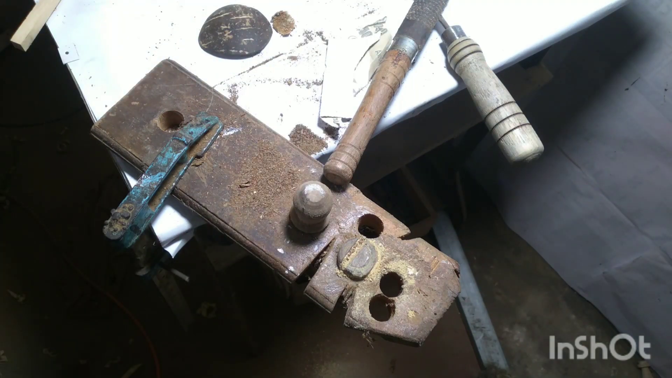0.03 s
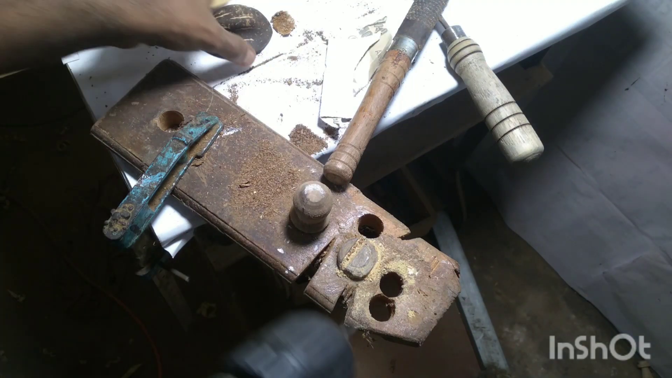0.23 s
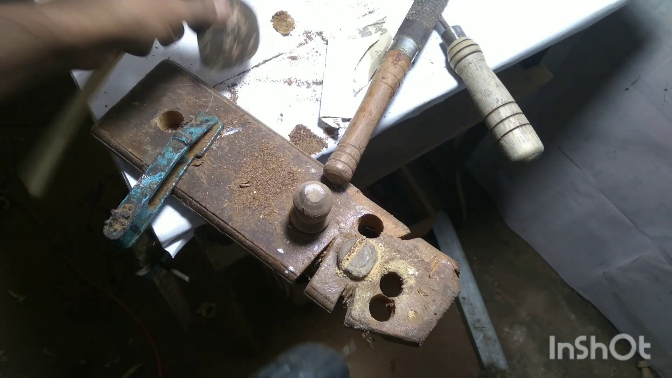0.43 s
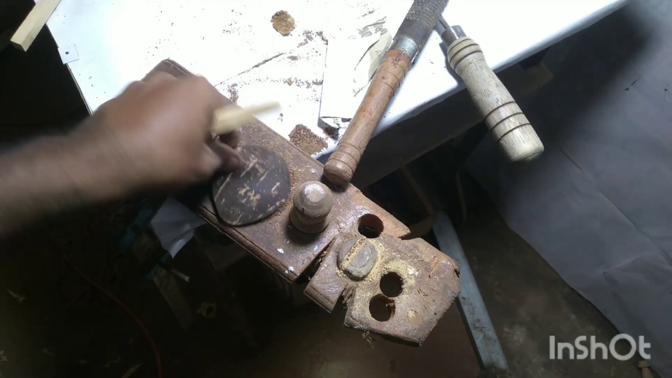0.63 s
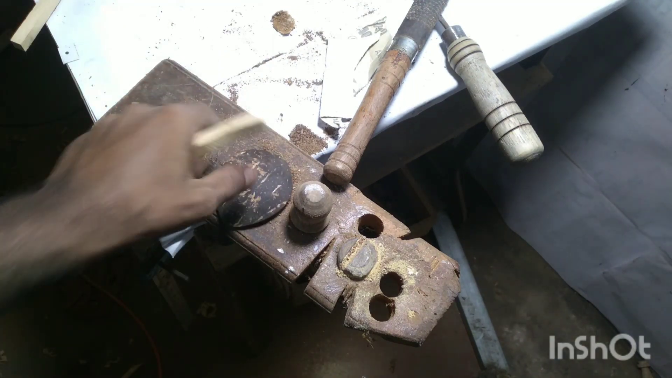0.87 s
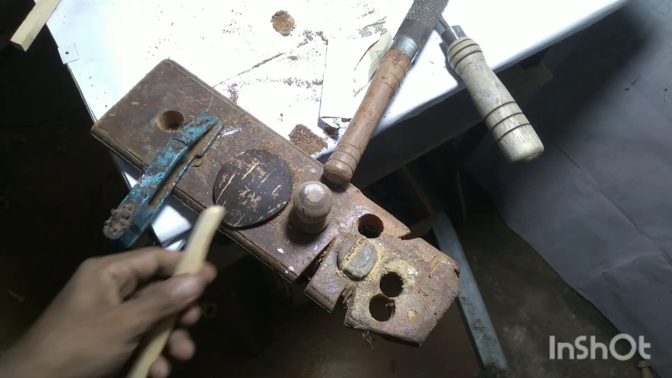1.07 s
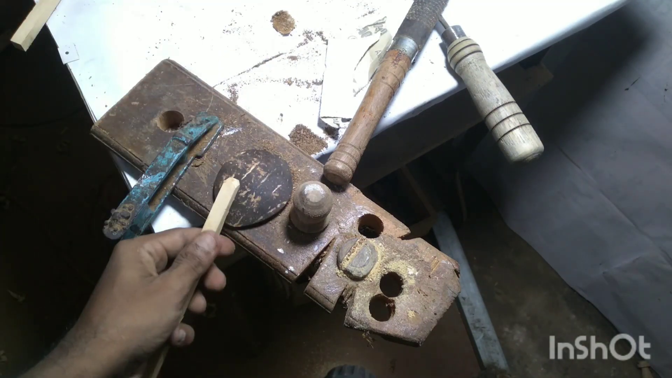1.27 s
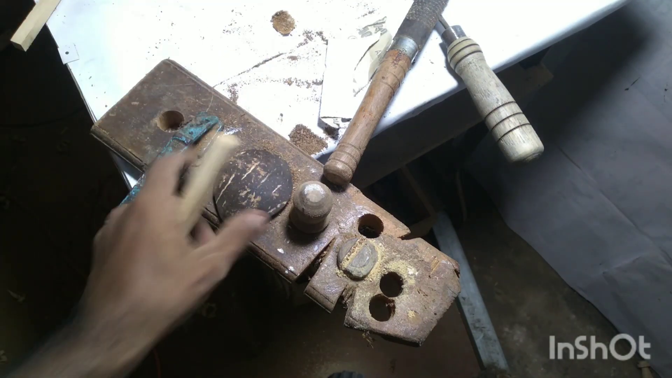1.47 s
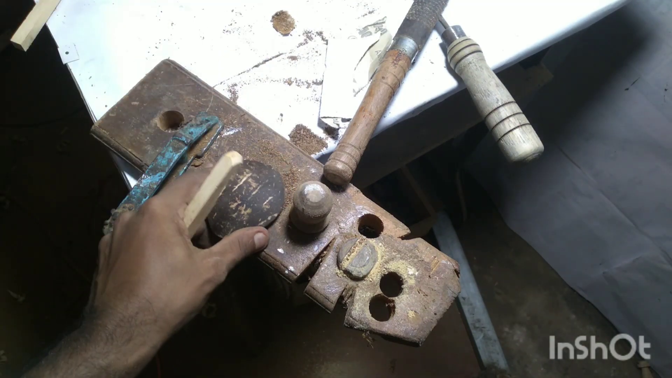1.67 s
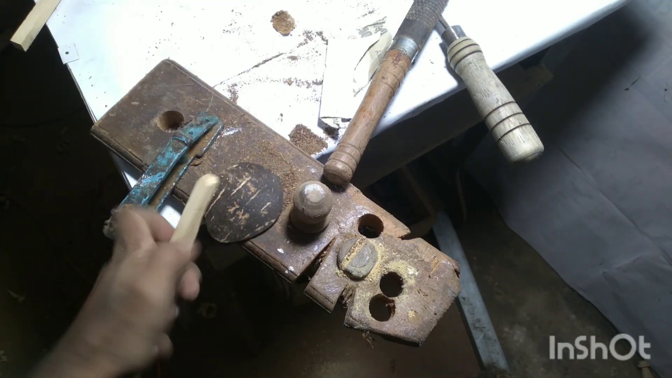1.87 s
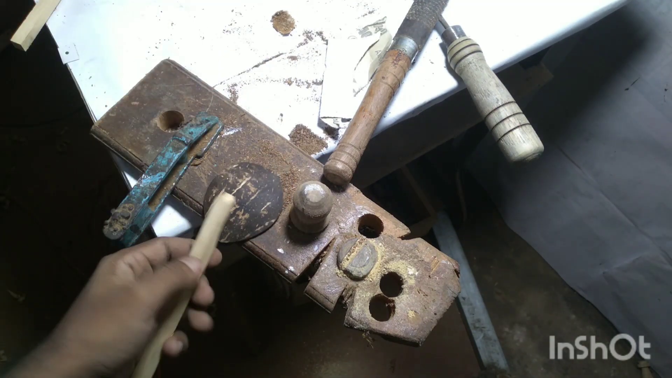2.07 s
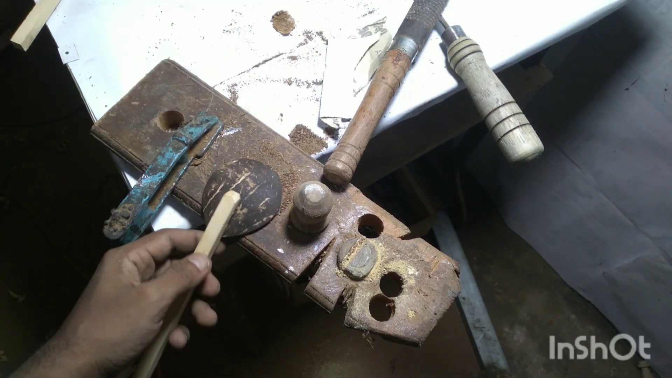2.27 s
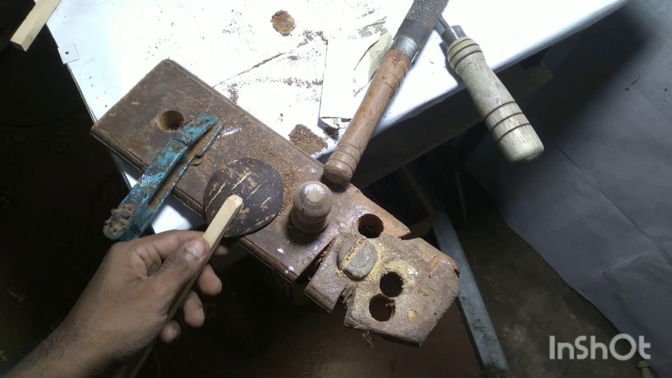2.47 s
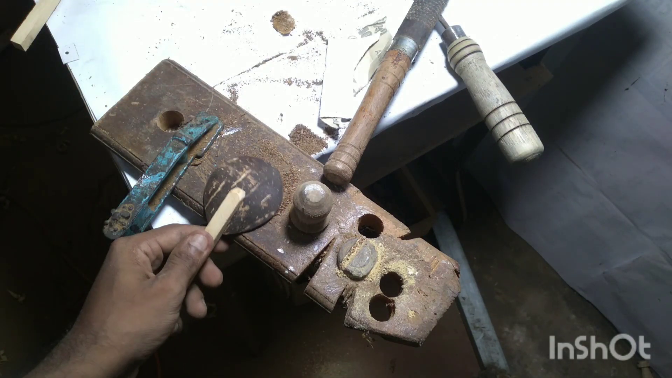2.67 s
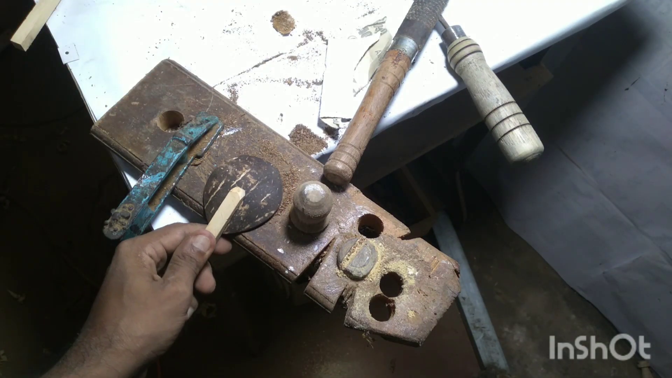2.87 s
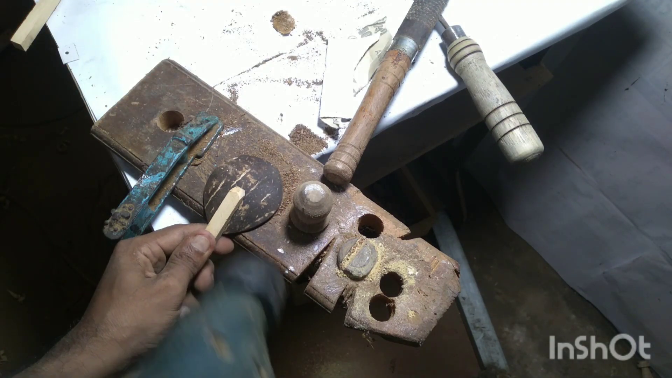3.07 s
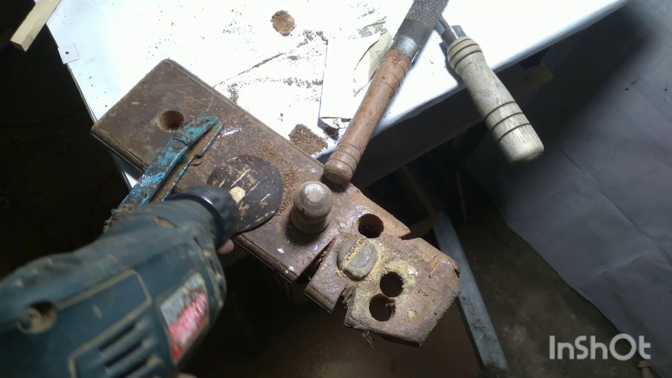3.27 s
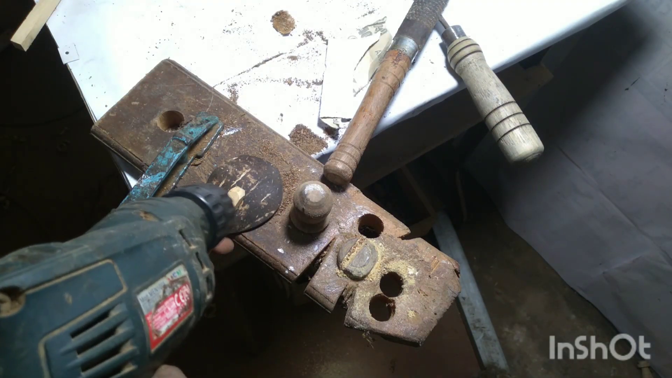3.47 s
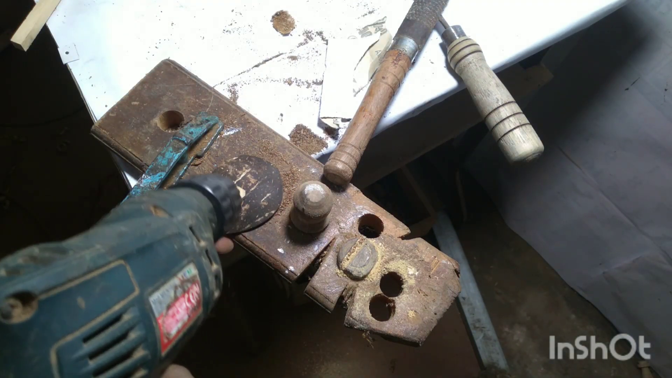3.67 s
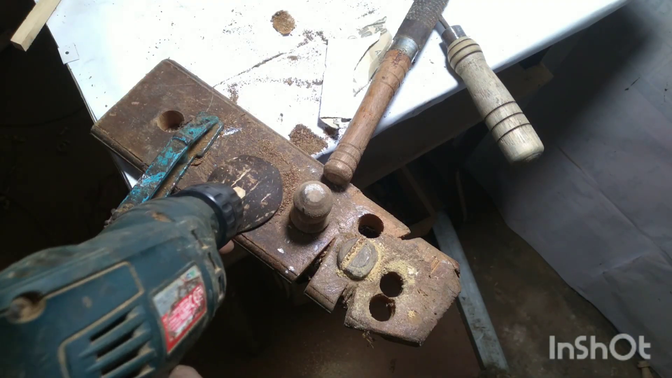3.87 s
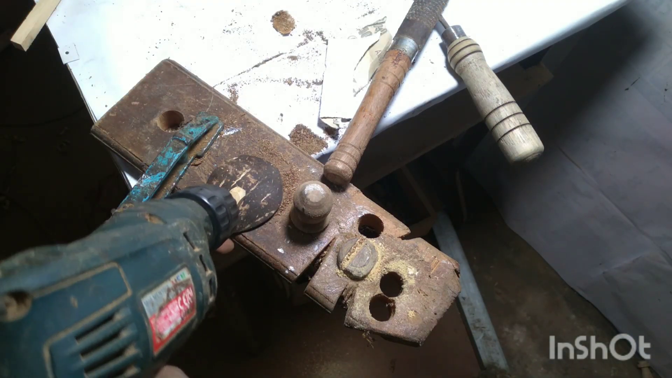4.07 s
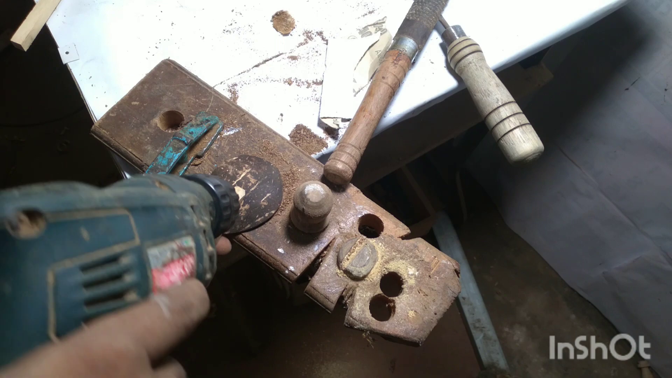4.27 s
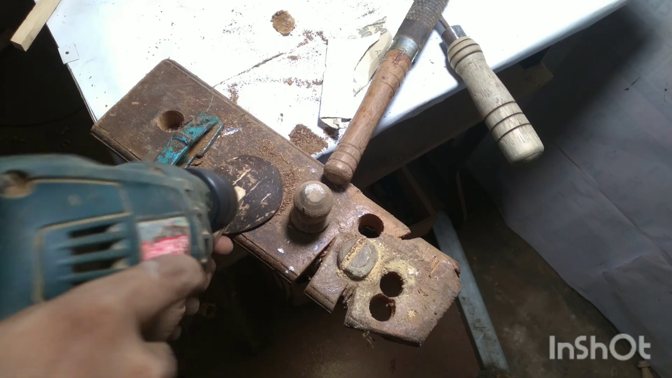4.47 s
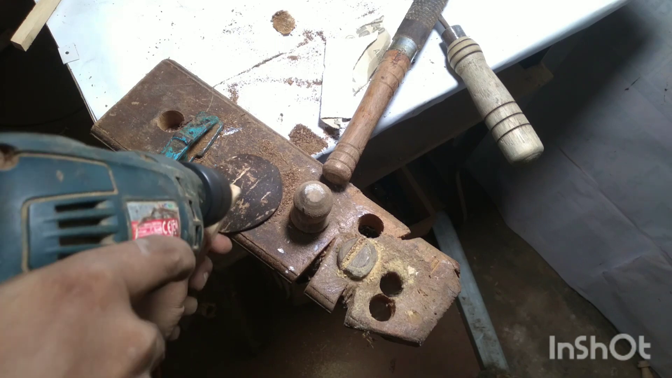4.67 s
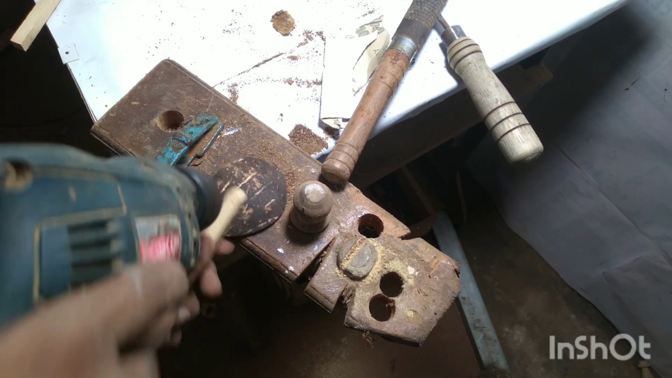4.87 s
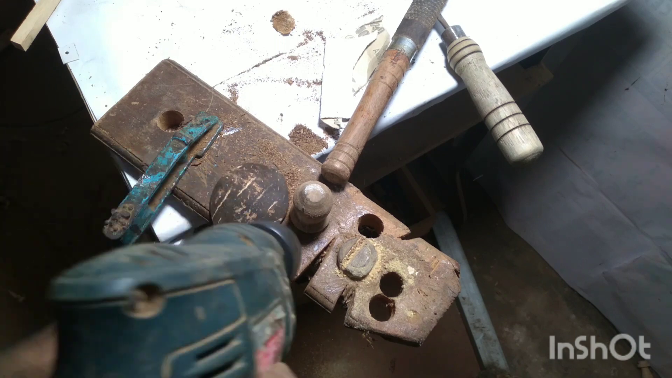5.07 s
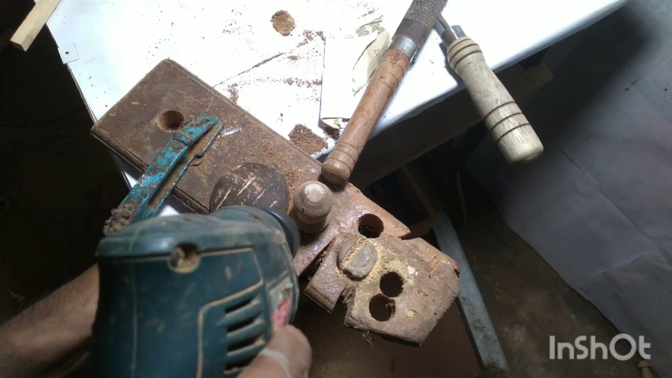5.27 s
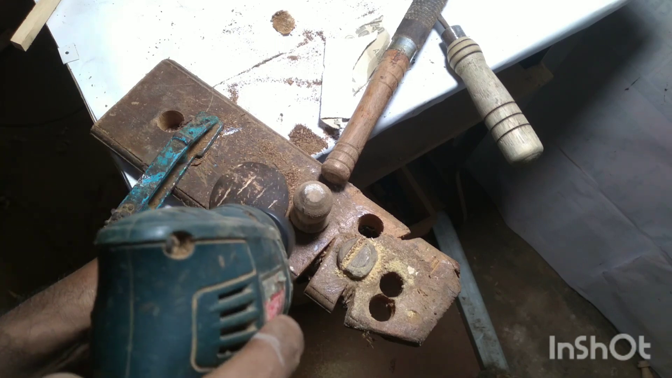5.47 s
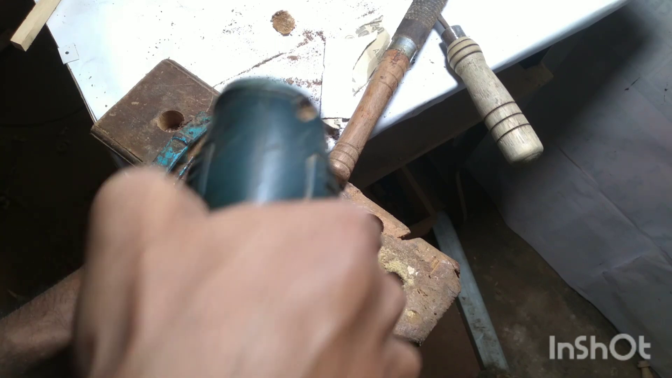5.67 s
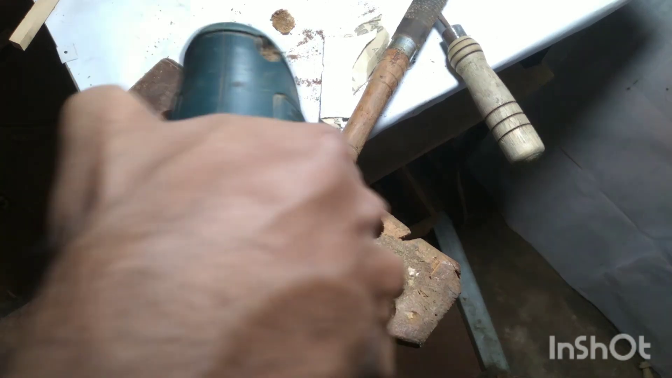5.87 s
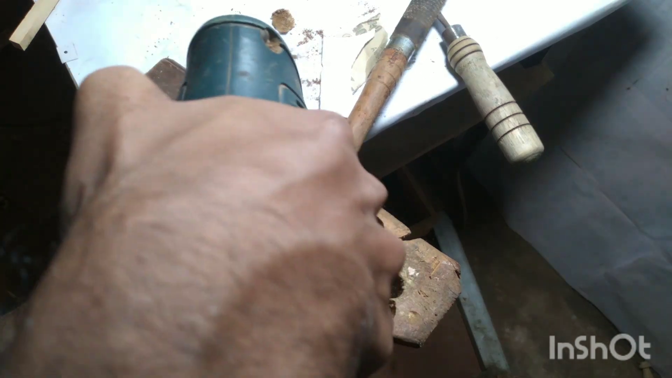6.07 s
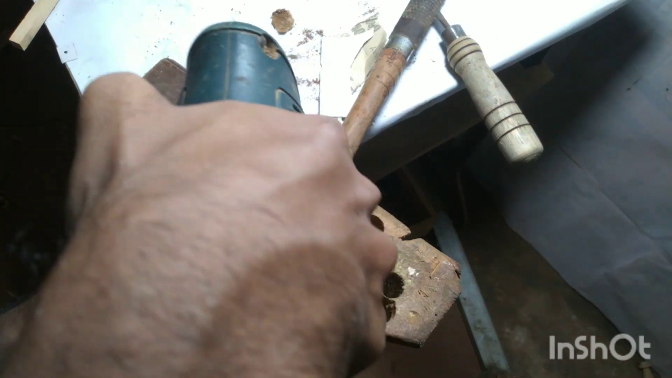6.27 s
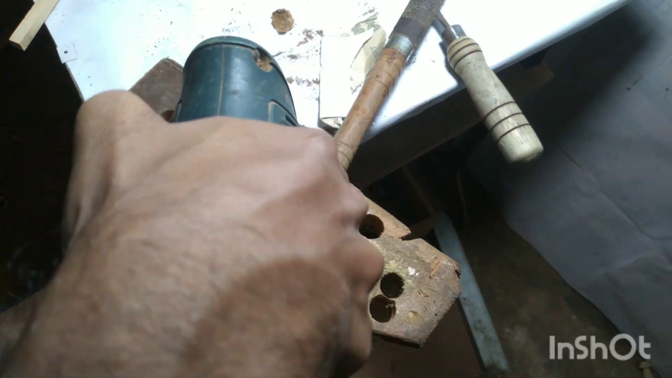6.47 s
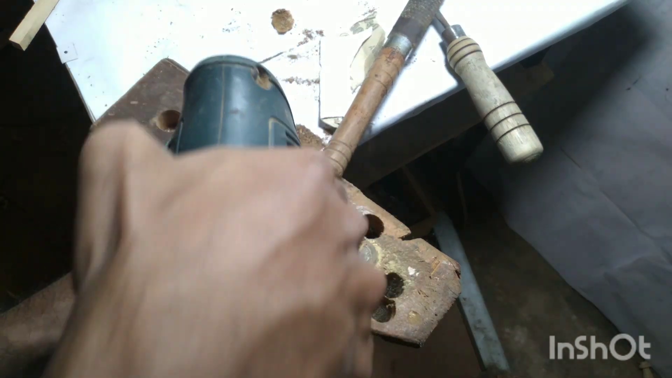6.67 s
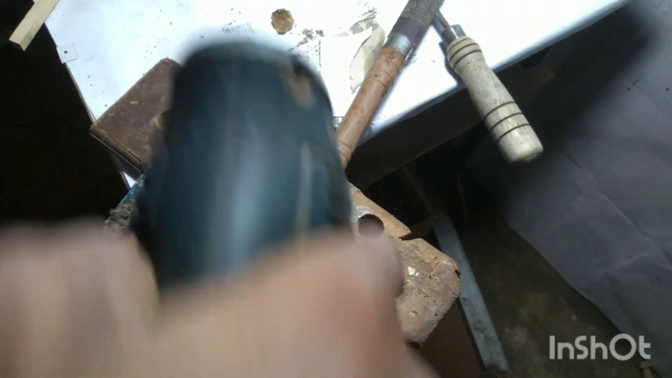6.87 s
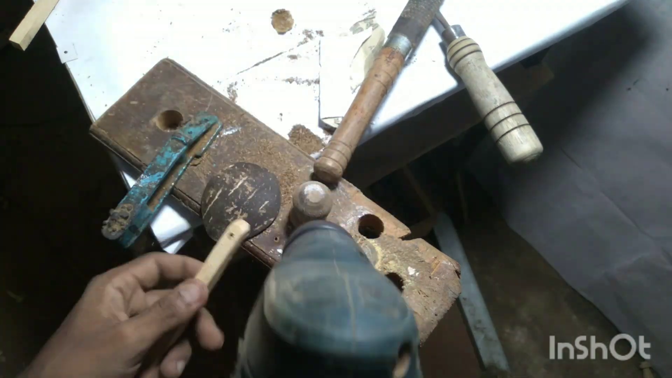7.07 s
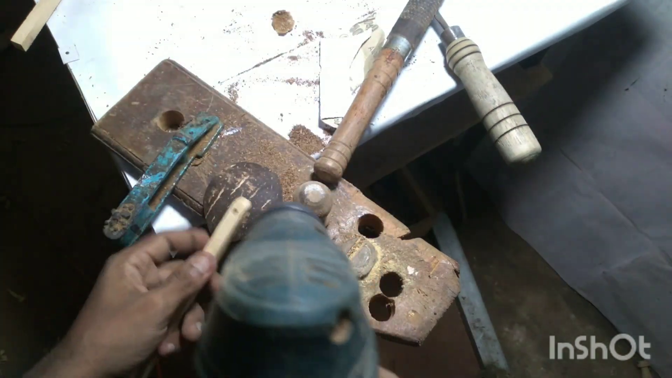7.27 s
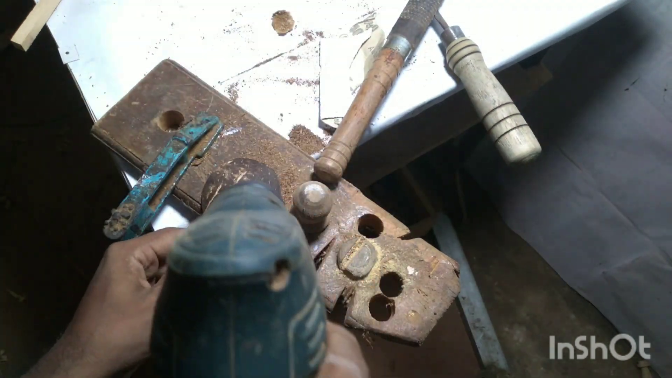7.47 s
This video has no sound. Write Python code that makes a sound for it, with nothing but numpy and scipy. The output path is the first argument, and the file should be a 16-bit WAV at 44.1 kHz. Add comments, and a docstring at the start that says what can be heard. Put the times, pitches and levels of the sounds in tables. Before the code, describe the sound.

Quiet shell scrapes and taps in a small workshop, then two loud hand-drill runs, each coasting down in a long falling whine.

```python
"""A coconut shell scrapes over a bench, taps click, and the set-down shell knocks, rattles and rings.
Hands rub and press the wood. A mains hand drill then runs twice, coasting down each time: filtered noise
for air and growl, random impacts for gear rattle, sines on rotor multiples for the whine. Mains pulses
roughen the roar under torque. Late in the second run the pinion sings as the bit cuts, then the shell
rattles at breakthrough. Low rumble throughout, faint thin hiss at times; small workshop echoes on the drill."""
import sys
import numpy as np
from scipy import signal
from scipy.fft import rfft, irfft, next_fast_len
from scipy.io import wavfile
from scipy.ndimage import uniform_filter1d, map_coordinates

SR = 44100
rng = np.random.default_rng(int(sys.argv[2]) if len(sys.argv) > 2 else 0)


def wav_record(signal):
    """Record a signal, one row per channel, as 16-bit PCM in the file named by sys.argv[1]."""
    frames = np.transpose(np.atleast_2d(signal))
    bounded = np.clip(frames, -1, 1)
    # unit amplitude maps onto the largest positive 16-bit level
    quanta = np.round(bounded * 32767).astype(np.int16)
    wavfile.write(sys.argv[1], SR, quanta)


N = 331191

# Levels in the tables are relative.
# Room rumble spectrum: (frequency [Hz], density [dB])
RUMBLE_SPECTRUM = [(12, -26.5), (20, 7), (35, -16), (49, -11.5), (164, -20.5), (229, -26.5), (328, -27),
                   (367, -29), (713, -39), (1510, -58), (3100, -56), (3970, -55), (4900, -62), (15000, -70)]
# Faint thin hiss: (start [s], length [s], level [dB])
HISS_STROKES = [(.07, .06, -76), (1.43, .11, -83), (2.22, .06, -90), (2.47, .08, -82), (2.96, .05, -86),
                (3.65, .1, -82), (4.15, .07, -84)]

# Shell scraping over the bench: (start [s], length [s], level [dB])
SLIDE_STROKES = [(.053, 0.015, -54.5), (.245, 0.22, -58.5), (.355, 0.022, -46), (.403, 0.017, -46)]
# Scrape spectrum: (frequency [Hz], density [dB])
SLIDE_SPECTRUM = [(350, -40), (600, -13), (668, -17), (852, -11), (1440, -9.5), (3190, 1), (6000, -4),
                  (8000, -2), (10500, -11.5), (15000, -26)]

# Stick and drill tap shell and bench: (time [s], click [dB], thud [dB], tail length [s])
TAPS = [(0.064, -51, -75, 0.013), (0.308, -53, -65, .005), (0.37, -66, -68, .005), (2.692, -92, -67, .005),
        (3.143, -79, -69, .005), (3.351, -53, -59, 0.035), (3.427, -64.5, -63, 0.013),
        (3.593, -59, -58, 0.023), (3.611, -42, -39, 0.099), (3.632, -42.5, -54, .05),
        (3.749, -49, -49.5, .05), (3.781, -58.5, -70, .02), (3.988, -66, -64, .003),
        (3.998, -59, -59.5, .003), (4.012, -72, -72, .003), (4.166, -74, -72, .005),
        (4.217, -72, -72, .005)]
# Shell set down and nudged:
# (time [s], rattle [dB], ring [dB], contact brightness [Hz], thud [dB], tail length [s])
KNOCKS = [(1.55, -45.5, -40, 2900, -52, 0.095), (1.787, -64, -41, 780, -57.5, 0.031),
          (2.147, -93, -62, 700, -67, 0.0093), (2.309, -78, -52, 700, -63.5, 0.013),
          (2.388, -77, -56, 700, -62, .0092), (4.336, -75, -55, 1090, -68, .004)]
# Hand and shell rub the plank: (start [s], length [s], level [dB])
RUB_STROKES = [(.58, 0.13, -64.5), (1.22, 0.24, -69), (1.41, .035, -61)]
# Click spectrum: (frequency [Hz], density [dB])
CLICK_SPECTRUM = [(470, -29), (800, -2), (1260, -9.5), (3530, -4), (4190, -5), (5910, -18.5), (8740, -19.5),
                  (10400, -33), (15000, -56)]
# Knock spectrum before the shell modes: (frequency [Hz], density [dB])
KNOCK_SPECTRUM = [(700, -4), (1050, 3), (1700, -3.5), (2700, 3.5), (4500, -11), (10000, -31)]
# Plank resonances: (frequency [Hz], width [Hz], level [dB])
PLANK_MODES = [(113, 22, 5.5), (306, 32, 3), (460, 240, -9), (669, 41, -2.5)]
# Shell resonances: (frequency [Hz], width [Hz], level [dB])
SHELL_MODES = [(720, 28, 0), (950, 110, -7), (1205, 110, -3.5), (1450, 200, -8.5), (1750, 300, -11),
               (2150, 220, -7), (2600, 250, -17)]
# Ringing of the loose shell: (frequency [Hz], level [dB], t60 [s])
LOOSE_SHELL_MODES = [(377, -18, 0.24), (592, -14.5, 0.28), (695, -9, 0.25), (1030, -9, 0.15),
                     (1420, -8, 0.15), (2137, -10, 0.081), (2620, 2, .07)]

# Hand or tool bears on the bench: (start [s], length [s], shake [dB])
PRESSES = [(.6, 0.069, -55.5), (3.36, 0.55, -61), (3.75, 0.055, -52), (4.45, 0.16, -38.5),
           (4.6, 0.089, -33), (4.7, 0.1, -28), (5.45, .47, -41.5), (5.95, 0.19, -27.5),
           (6.22, 0.032, -25.5), (6.59, 0.069, -34.5)]
# Bench resonances: (frequency [Hz], width [Hz], level [dB])
BENCH_MODES = [(54.7, 10.4, -0.5), (121.8, 8.6, 5.5), (270, 41, -10)]

# Trigger: (pulled [s], released [s])
TRIGGER = [(4.404, 4.802), (5.702, 6.849)]
# Steady cut: (start [s], length [s], load re full [dB])
CUT_STROKES = [(6.08, .62, 0)]
# Bit catching as it breaks through: (start [s], length [s], grip re full [dB])
CATCH_STROKES = [(6.595, .068, 0)]
FREE_HZ, SPIN_UP_S, COAST_S, FRICTION_HZ_PER_S = 466, .103, 1.15, 12  # rotor; _S are time constants
CUT_SAG_HZ, CATCH_SAG_HZ = 10.5, 35  # speed target lowered at full load

# Gears taking up slack: (time [s], level [dB])
GEAR_SNAPS = [(4.403, -19), (4.415, -19), (4.554, -15), (5.357, -19), (6.827, -14), (6.947, -15)]
# Gear housing resonances: (frequency [Hz], width [Hz], level [dB])
HOUSING_MODES = [(1470, 920, -5.5), (2316, 350, 1), (2855, 330, 2), (4100, 570, 1), (5450, 530, -1.5),
                 (8060, 2200, -7)]
# Drill air spectra, fast and slow rotor: (frequency [Hz], density [dB])
FAST_AIR_SPECTRUM = [(88, -43.5), (150, -26), (374, -13.5), (700, -15), (1050, -7.5), (1500, -3.5),
                     (2240, -2.5), (2900, -4.5), (3400, -2), (4430, -3), (6160, -7.5), (8090, -7),
                     (15700, -38.5)]
SLOW_AIR_SPECTRUM = [(88, -39), (150, -31), (285, -16.5), (346, -14.5), (473, -18.5), (597, -6.5),
                     (916, -16), (1330, -2.5), (2000, -6.5), (2520, -6.5), (4170, -5.5), (6040, -14.5),
                     (8090, -15.5), (15700, -43.5)]
# Motor growl spectrum: (frequency [Hz], density [dB])
GROWL_SPECTRUM = [(60, -5), (150, -5.5), (420, -2), (900, -2.5), (1800, -9.5), (4000, -36)]
# Gear rattle spectrum: (frequency [Hz], density [dB])
RATTLE_SPECTRUM = [(9000, 1.5), (12000, -18), (15000, -1.5)]
ROAR_DB, ROAR_DB_PER_OCTAVE, POWER_DB, TORQUE_DB = -21, 7.5, 1, 10  # last two: added at full power, torque
GROWL_DB = -37
MAINS_HZ, MAINS_DB = 50, 4.5  # ripple depth at full torque
GRAIN_DB, SLACK_DB_PER_OCTAVE = .9, .8  # random grain; extra as coasting gears slow

# Unbalance, bearing, fan and commutator: (multiple of rotor speed, level [dB], phase blur [rad])
WHINE_LINES = [(1, -39, .25), (2, -40, .35), (2.58, -43, .35), (4.6, -39.5, 1), (5, -37, 2), (6, -38, 2),
               (12, -31.3, .5), (24, -42, .8), (37, -37, .65), (48, -42, .9)]
# Pinion lines at full cut: (multiple of rotor speed, level [dB], phase blur [rad])
PINION_LINES = [(2, -43, .6), (5, -30.5, .65), (6, -33.5, .45), (10, -24.7, .35), (15, -36, .5)]
# Casing radiation: (frequency [Hz], gain [dB])
CASING_GAIN = [(200, -12), (380, 0), (500, -1.5), (750, 1), (1100, 2), (1400, 2.5), (1800, -3), (2300, -1),
               (2900, -2), (3500, 1), (3850, -2.5), (4200, 3.5), (4550, -1), (4800, -7.5), (5400, -7.5),
               (7000, -2), (8800, 2), (12000, -14), (15000, -16)]

# Drill shifting between runs: (time [s], lag of left port [ms], left minus right [dB])
SHIFT = [(4.8, 0.22, 0), (5.3, .18, 1), (5.75, 0.091, 3.5), (7.5, 0.096, 0)]
# Workshop decay: (frequency [Hz], t60 [s])
WORKSHOP_T60 = [(150, 0.068), (1500, 0.21), (10000, 1)]

# Bit grabbing the rim of the hole: (time [s], level [dB])
GRABS = [(6.594, -7), (6.607, -2), (6.618, 1), (6.636, 2), (6.649, -.5), (6.664, -.5), (6.685, -6),
         (6.708, -8)]

TOP_HZ = 15820


def amp(db):
    """Decibels to gain."""
    return 10 ** (np.asarray(db) / 20)


def unit(x):
    """Scale to rms 1."""
    return x / np.sqrt(np.mean(x ** 2) + 1e-20)


def along(points, hz):
    """Interpolate (frequency [Hz], value) points on a log axis."""
    point_hz, values = np.transpose(points)
    return np.interp(np.log(hz + 1), np.log(point_hz + 1), values)


def curves(rows):
    """One sample-rate curve per column after the time [s]."""
    times_s, *columns = np.transpose(rows)
    return [np.interp(np.arange(N) / SR, times_s, column) for column in columns]


def noise():
    """White noise of rms 1."""
    return rng.standard_normal(N)


def wobble(rate_hz):
    """Random curve: Gaussian knots at rate_hz joined by straight lines."""
    knots = np.arange(0, N + SR / rate_hz, SR / rate_hz)
    return np.interp(np.arange(N), knots, rng.standard_normal(len(knots)))


def filtered(x, response):
    """Multiply the spectrum by response(frequency [Hz])."""
    size = next_fast_len(N + SR // 2, True)
    return irfft(rfft(x, size) * response(np.fft.rfftfreq(size, 1 / SR)), size)[..., :N]


def coloured(x, spectrum):
    """Minimum-phase filter with the given (Hz, dB) shape, keeping the power of white noise."""
    size = 4096
    cepstrum = irfft(np.log(amp(along(spectrum, np.fft.rfftfreq(size, 1 / SR)))))
    # fold the cepstrum to make the filter causal
    cepstrum[1:size // 2] *= 2
    cepstrum[size // 2 + 1:] = 0
    kernel = irfft(np.exp(rfft(cepstrum)))
    kernel /= np.linalg.norm(kernel)
    return signal.oaconvolve(np.atleast_2d(x), kernel[None], axes=1)[:, :N].reshape(x.shape)


def resonate(x, modes):
    """Parallel resonances of alternating sign, keeping the power of white noise."""
    def ring(v):
        total = 0
        for k, (hz, width_hz, db) in enumerate(modes):
            b, a = signal.iirpeak(hz, hz / width_hz, SR)
            total = total + (-1) ** k * amp(db) * signal.lfilter(b, a, v)
        return total
    return ring(x) / np.linalg.norm(ring(signal.unit_impulse(SR // 2)))


def bursts(times_s, levels_db, t60):
    """Envelope of sudden blows that decay 60 dB in t60 [s], summed in power."""
    samples = np.round(np.asarray(times_s) * SR).astype(int)
    starts = np.bincount(samples, amp(levels_db) ** 2, N)
    return np.sqrt(signal.lfilter([1], [1, -amp(-120 / (t60 * SR))], starts + 1e-20))


def held(rows, attack_s, fall_db_per_s):
    """Envelope of (start [s], length [s], level [dB]) strokes: each rises, holds and dies away."""
    t = np.arange(N) / SR
    strokes = []
    for start_s, length_s, db in rows:
        rise = np.clip((t - start_s) / attack_s, 0, 1)
        overtime_s = np.maximum(t - start_s - length_s, 0)
        strokes.append(rise * amp(db - fall_db_per_s * overtime_s))
    return np.max(strokes, axis=0)


def stereo_noise(spread_db, lag_ms=0.13):
    """Stereo noise: a shared part, late on the left, plus an independent part at each port."""
    shared = noise()
    pair = np.array([np.roll(shared, round(lag_ms * SR / 1000)), shared])
    return unit(pair + amp(spread_db) * rng.standard_normal((2, N)))


def room_tone():
    """Low, almost steady rumble, only partly shared between the two ports, and a narrow hiss that comes and
    goes."""
    rumble = coloured(stereo_noise(spread_db=1.5), RUMBLE_SPECTRUM) * amp(-55.0 + 0.16 * wobble(4.06))
    hiss = coloured(stereo_noise(spread_db=7), [(3300, -35), (3850, 0), (4100, 0), (4700, -35)])
    return rumble + hiss * held(HISS_STROKES, attack_s=.05, fall_db_per_s=200)


def slide():
    """The rough shell scrapes over the bench top in uneven grains of noise."""
    grains = unit(stereo_noise(spread_db=5) * amp(3 * wobble(980) + 1.8 * wobble(90)))
    return coloured(grains, SLIDE_SPECTRUM) * held(SLIDE_STROKES, attack_s=0.03, fall_db_per_s=650)


def cut_tails(times_s, lengths_s):
    """Uneven gain of the noisy tail around each blow, cut short with smoothed edges."""
    t = np.arange(N) / SR
    is_open = sum((t > s) & (t < s + length) for s, length in zip(times_s, lengths_s)) > 0
    return uniform_filter1d(is_open * 1., size=700) * amp(2.5 * wobble(500))


def shell_ring(times_s, levels_db, contact_hz):
    """The loose shell rings after each knock; a soft contact wakes only its low modes."""
    t = np.arange(N) / SR
    ring = 0
    for hz, mode_db, t60 in LOOSE_SHELL_MODES:
        softness_db = 20 * np.log10(1 + (hz / contact_hz) ** 4)
        tone = np.sin(2 * np.pi * hz * t + .35 * wobble(120))
        ring = ring + tone * bursts(times_s, levels_db + mode_db - softness_db, t60)
    return ring


def handling():
    """Knocks ring and rattle the shell; knocks and taps click and thud; rubbing murmurs in the plank."""
    knock_s, rattle_db, ring_db, contact_hz, knock_thud_db, knock_tail_s = np.transpose(KNOCKS)
    tap_s, tap_click_db, tap_thud_db, tap_tail_s = np.transpose(TAPS)
    tails = cut_tails(knock_s, knock_tail_s) + cut_tails(tap_s, tap_tail_s)

    def blow(times_s, db, t60, tail_db):
        return bursts(times_s, db, t60) + tails * bursts(times_s, db + tail_db, t60=0.33)

    every_s = np.r_[knock_s, tap_s]
    thuds = blow(every_s, np.r_[knock_thud_db, tap_thud_db], t60=0.23, tail_db=-2.0)
    clicks = blow(every_s, np.r_[rattle_db - 9, tap_click_db], t60=0.046, tail_db=-7.5)
    rattles = blow(knock_s, rattle_db, t60=0.015, tail_db=-5)

    rub = held(RUB_STROKES, attack_s=0.031, fall_db_per_s=240)
    plank = resonate(stereo_noise(spread_db=-9.0) * (thuds + rub), PLANK_MODES)
    shell = resonate(coloured(stereo_noise(spread_db=13.0) * rattles, KNOCK_SPECTRUM), SHELL_MODES)
    ring = shell_ring(knock_s, ring_db, contact_hz)
    ring = np.array([np.roll(ring, 6), ring])  # left late by 6 samples
    return plank + shell + ring + coloured(stereo_noise(spread_db=9.5) * clicks, CLICK_SPECTRUM)


def bench_shake():
    """Pressing shakes the bench, which booms in its lowest modes."""
    boom = unit(resonate(noise(), BENCH_MODES))
    return boom * held(PRESSES, attack_s=0.031, fall_db_per_s=92)


def bit_load():
    """Load of the steady cut and of the final catch, each 0-1."""
    cut = held(CUT_STROKES, attack_s=.17, fall_db_per_s=120)
    catch = held(CATCH_STROKES, attack_s=.03, fall_db_per_s=300)
    return cut, catch


def rotor():
    """Speed [Hz], turns and power (0-1): first-order approach to loaded speed, else drag and friction."""
    t = np.arange(N) / SR
    on = sum((t >= pulled) & (t < released) for pulled, released in TRIGGER) > 0
    cut, catch = bit_load()
    loaded_hz = FREE_HZ - CUT_SAG_HZ * cut - CATCH_SAG_HZ * catch
    coast_goal_hz = -FRICTION_HZ_PER_S * COAST_S * (t > TRIGGER[0][0])
    goal_hz = np.where(on, loaded_hz, coast_goal_hz)
    # closed-form solution with a switching time constant
    step = 1 / np.where(on, SPIN_UP_S, COAST_S) / SR
    memory = np.exp(np.cumsum(step))
    speed = np.maximum(np.cumsum(goal_hz * step * memory) / memory, 0)
    power = signal.lfilter(*signal.butter(1, 7, fs=SR), on * 1.)
    return speed, np.cumsum(speed) / SR, power


def octaves(speed, slowest_hz=170):
    """Rotor speed in octaves from free speed, floored at slowest_hz."""
    return np.log2(np.maximum(speed, slowest_hz) / FREE_HZ)


def drive_gate(first=0.99, rise_s=0.4):
    """Silent before the first pull, then from first to 1 at a slope of 1 / rise_s."""
    since_s = np.arange(N) / SR - TRIGGER[0][0]
    return (since_s > 0) * np.clip(first + since_s / rise_s, 0, 1)


def gear_snaps():
    """Very short noise bursts clack in the housing resonances."""
    times_s, levels_db = np.transpose(GEAR_SNAPS)
    return resonate(noise() * bursts(times_s, levels_db, t60=0.00024), HOUSING_MODES)


def impacts(cycles, scatter_db):
    """One impulse of random size each time the cycle count passes a whole number; rms 1."""
    hits = np.diff(np.floor(cycles), prepend=0) > 0
    return unit(hits * amp(scatter_db * noise()))


def drill_roar(speed, turns, power):
    """Air and brushes rush, gears rattle in the housing; louder with speed and torque."""
    torque = power * (1 - speed / FREE_HZ)
    level_db = ROAR_DB + ROAR_DB_PER_OCTAVE * octaves(speed) + POWER_DB * power + TORQUE_DB * torque
    # chopped once a turn under power; darkens as the rotor slows
    fast = np.clip((speed - 270) / 170, 0, 1)
    chop = 1 + 0.35 * power * np.sin(2 * np.pi * turns)
    air = np.sqrt(fast) * coloured(noise() * chop, FAST_AIR_SPECTRUM) * amp(level_db - 2.0)
    air += np.sqrt(1 - fast) * coloured(noise() * chop, SLOW_AIR_SPECTRUM) * amp(level_db - 3.5)
    # random-sized impacts twice a turn, of random sign
    hits = impacts(PINION_LINES[0][0] * turns, scatter_db=5) * np.sign(noise())
    # relative to the roar, the rattle is very slightly stronger at low speed
    rattle_gain = amp(level_db - 10.0 - 0.43 * fast)
    rattle = coloured(resonate(hits, HOUSING_MODES), RATTLE_SPECTRUM) * rattle_gain
    growl = coloured(noise(), GROWL_SPECTRUM) * power * amp(GROWL_DB)
    return air + rattle + growl


def patchy(x, depth_db):
    """Random peaks and dips a few hundred hertz wide come and go."""
    z = signal.stft(x, nperseg=512)[2]
    field = rng.standard_normal(z.shape[-2:])
    field = uniform_filter1d(field, size=4, axis=0)
    field = uniform_filter1d(field, size=22, axis=1)
    return signal.istft(z * amp(depth_db * unit(field)), nperseg=512)[1][..., :N]


def roughness(speed, power):
    """Gain pulsing with each mains half wave under torque, plus grain that grows in slack gears."""
    t = np.arange(N) / SR
    torque = power * (1 - speed / FREE_HZ)
    mains_db = MAINS_DB * torque * np.cos(4 * np.pi * MAINS_HZ * t)
    grain_db = GRAIN_DB - SLACK_DB_PER_OCTAVE * octaves(speed) * (1 - power)
    return amp(mains_db + grain_db * wobble(170))


def tones(turns, lines, flutter_db):
    """Sines on multiples of rotor speed, each wavering in level and phase."""
    total = 0
    for multiple, db, blur_rad in lines:
        level = amp(db + flutter_db * wobble(18)) * np.sqrt(2)
        total = total + level * np.sin(2 * np.pi * multiple * turns + blur_rad * wobble(140))
    return total


def drill_whine(speed, turns, power):
    """Rotor lines glide with speed; the pinion sings only while the bit cuts."""
    cut, _ = bit_load()
    # faster is louder; rotor lines sink while the motor pulls
    free_db = 8.5 * octaves(speed) - 4 * power
    whine = tones(turns, WHINE_LINES, flutter_db=2.8) * amp(free_db)
    pinion = tones(turns, PINION_LINES, flutter_db=1.5) * cut
    return filtered(whine + pinion, lambda hz: amp(along(CASING_GAIN, hz)))


def in_workshop(x, lag_ms, pan_db, wet_db, count=24):
    """Direct sound, late on the left, plus diffuse echoes whose random tails crossfade by section."""
    late = map_coordinates(x, [np.arange(N) - lag_ms * SR / 1000], order=3)
    direct = np.array([late, x])
    # random stereo tails with a frequency-dependent decay
    hz, t, z = signal.stft(rng.standard_normal((count + 1, 2, SR // 4)), SR, nperseg=256)
    t60 = along(WORKSHOP_T60, hz)[:, None]
    tails = signal.istft(z * amp(-60 * t / t60) / np.sqrt(t60), SR, nperseg=256)[1]
    tails /= np.linalg.norm(tails, axis=-1, keepdims=True)
    # overlapping sections, one tail each
    hop = N // count + 1
    padded = np.pad(x, (hop, 2 * hop))
    room = np.zeros((2, N + 3 * hop + SR))
    fade = np.sin(np.pi * np.arange(2 * hop) / (2 * hop))
    for k, tail in enumerate(tails):
        section = padded[k * hop:(k + 2) * hop] * fade
        echo = signal.fftconvolve(section[None], tail, axes=1)
        room[:, k * hop:k * hop + echo.shape[1]] += echo
    pan = amp(np.array([[.5], [-.5]]) * pan_db)
    return (direct + amp(wet_db) * room[:, hop:hop + N]) * pan


def breakthrough(rattle_db=-12, plank_db=-19, ring_db=-10):
    """Each grab rattles the shell in a gritty burst, rings its lowest mode and thumps the plank."""
    times_s, levels_db = np.transpose(GRABS)
    grit = unit(noise() * amp(0.85 * wobble(700))) * bursts(times_s, levels_db, t60=0.083)
    tone = np.sin(2 * np.pi * SHELL_MODES[0][0] * np.arange(N) / SR + .3 * wobble(80))
    ring = tone * bursts(times_s, levels_db + ring_db, t60=0.17)
    rattle = resonate(grit, SHELL_MODES)
    thump = amp(plank_db) * resonate(grit, PLANK_MODES)
    return (ring + rattle + thump) * amp(rattle_db)


def drill(whine_lag_ms=.01):
    """The roar fills the workshop; whine and shell rattle come more directly, almost without lag."""
    lag_ms, pan_db = curves(SHIFT)
    speed, turns, power = rotor()
    roar = drive_gate() * drill_roar(speed, turns, power) + gear_snaps()
    roar = in_workshop(roar, lag_ms, pan_db, wet_db=3, count=72)
    roar = patchy(roar, depth_db=1.1) * roughness(speed, power)
    near = drive_gate() * drill_whine(speed, turns, power) + breakthrough()
    return roar + in_workshop(near, whine_lag_ms, pan_db, wet_db=-6)


def scene():
    """Sum of room, shell, bench and drill; the shake leans slightly left."""
    shake = bench_shake() * amp([[.7], [-.7]])
    return room_tone() + slide() + handling() + shake + drill()


def record(dry):
    """The phone keeps nothing from TOP_HZ up."""
    return filtered(dry, lambda hz: hz < TOP_HZ)


dry = scene()
out = record(dry)
wav_record(out)
```